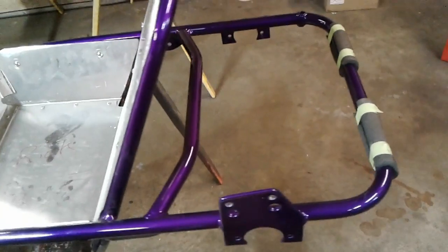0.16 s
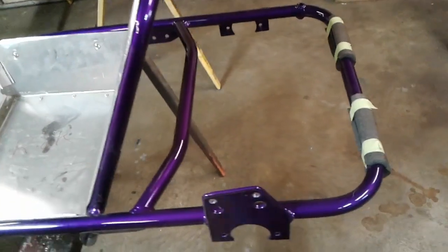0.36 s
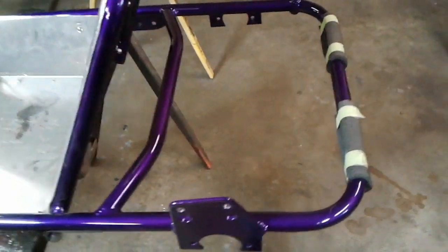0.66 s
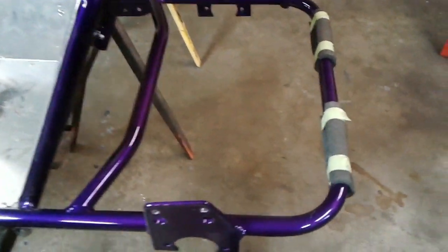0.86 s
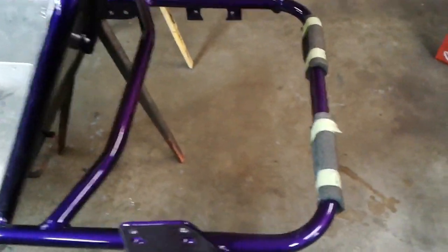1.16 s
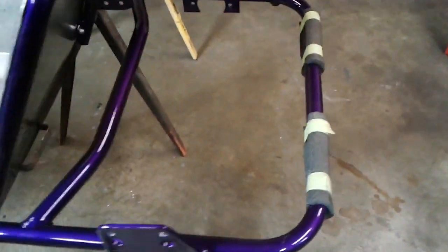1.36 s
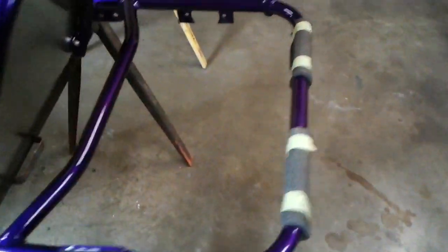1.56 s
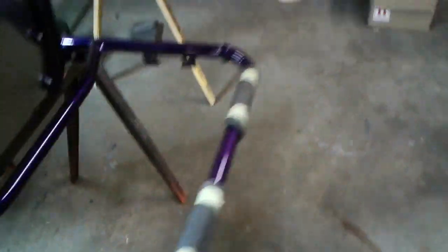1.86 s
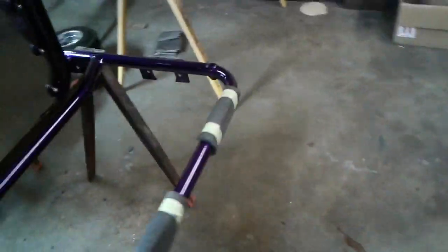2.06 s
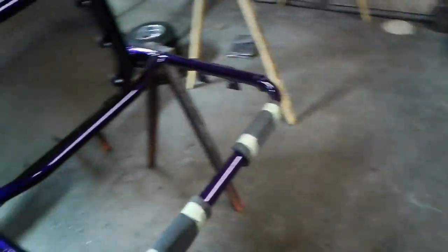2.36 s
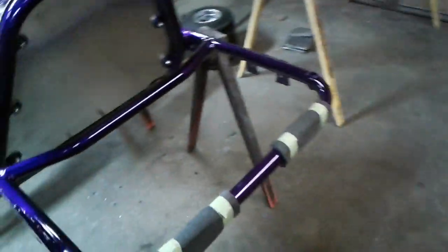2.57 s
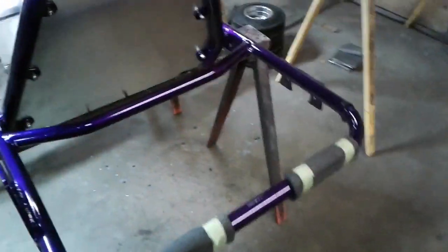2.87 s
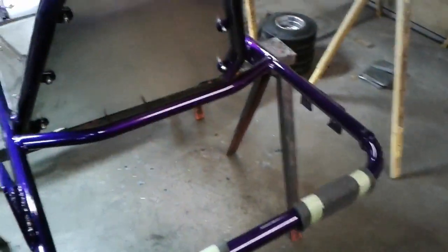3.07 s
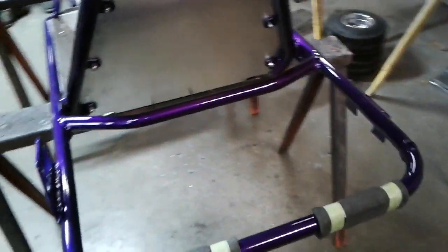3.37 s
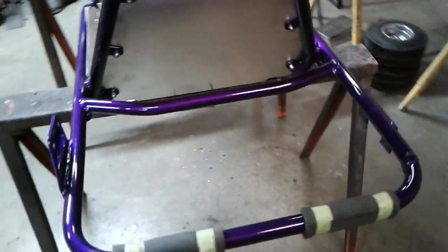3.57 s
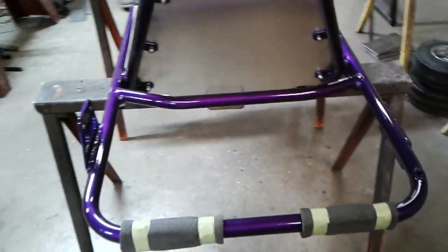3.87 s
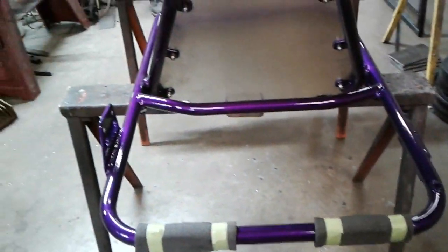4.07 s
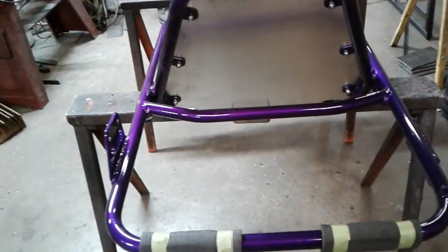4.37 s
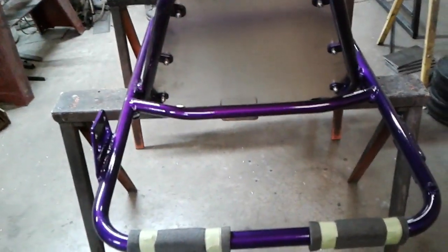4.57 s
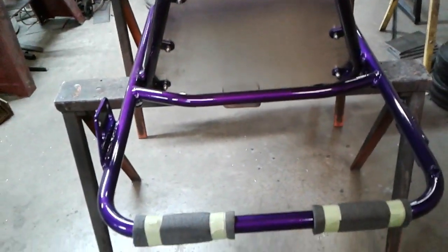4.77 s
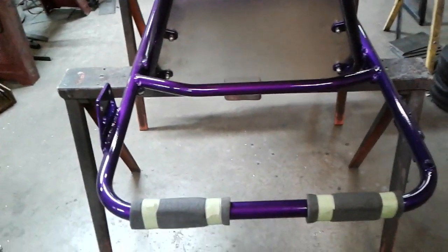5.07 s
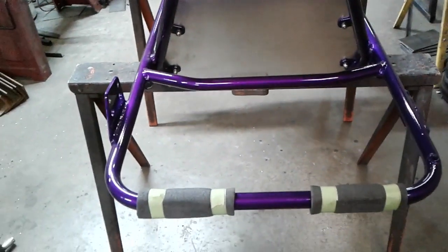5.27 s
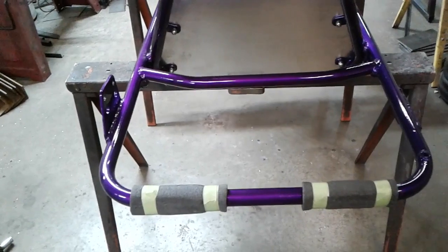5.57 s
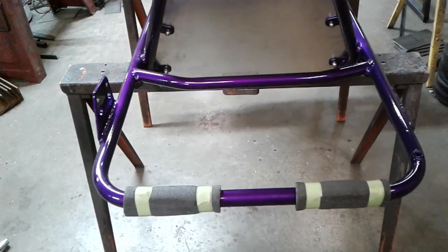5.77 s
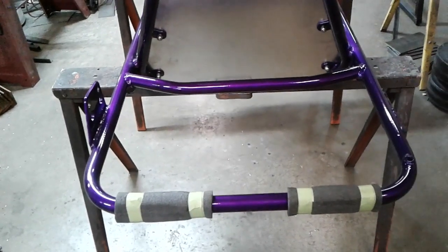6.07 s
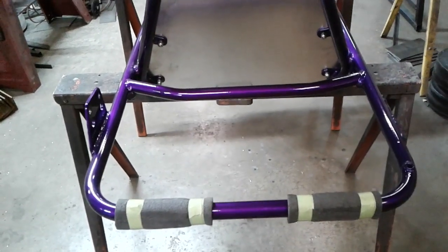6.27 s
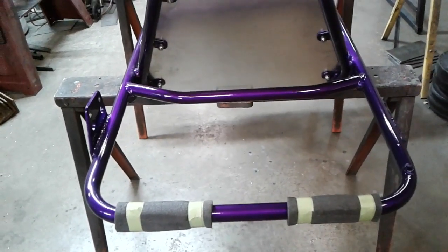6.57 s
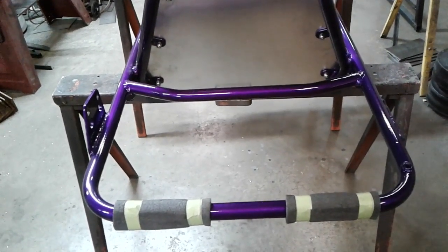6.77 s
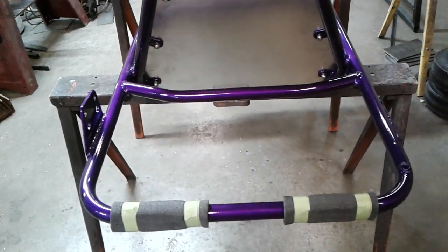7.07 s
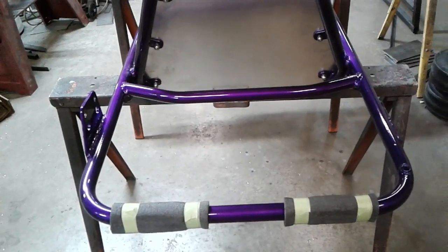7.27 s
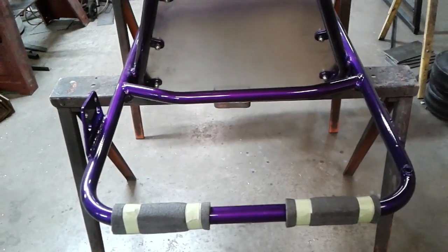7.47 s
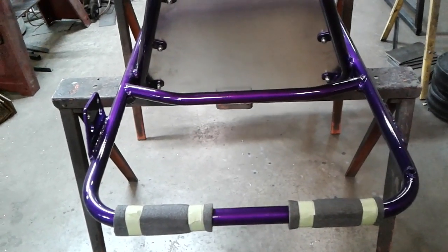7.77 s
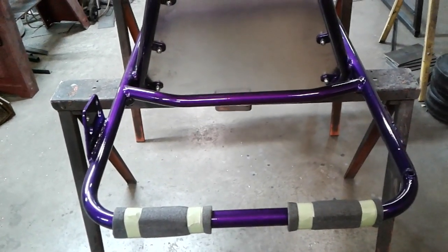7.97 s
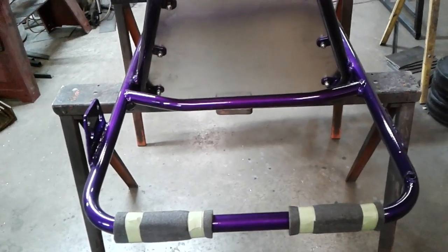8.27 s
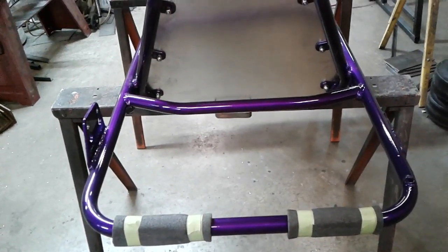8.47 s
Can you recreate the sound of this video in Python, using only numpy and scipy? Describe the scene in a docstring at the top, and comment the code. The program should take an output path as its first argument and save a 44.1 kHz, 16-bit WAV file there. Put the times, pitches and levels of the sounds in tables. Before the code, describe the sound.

A deep electric motor hum swells in a concrete-floored workshop, then holds steady, with soft cloth rustles, shoe scuffs and small ticks close by.

```python
"""A deep motor hum fills a workshop, with a light knock on every turn of the shaft, thin whines and rushing air.
Someone walks a few steps with the microphone, to where the deep hum is much stronger, then keeps still.
Clothes rustle, shoes scuff the concrete floor, a foot thuds softly and a few small ticks sound close by.
Hum, knock and whines are sums of wavering tones; air, cloth, scuffs and ticks are shaped noise;
the thud is a few low tones that ring and die away."""
import sys
import numpy as np
from scipy import signal
from scipy.fft import rfft, irfft, next_fast_len
from scipy.io import wavfile
from scipy.ndimage import uniform_filter1d

SR = 44100
rng = np.random.default_rng(int(sys.argv[2]) if len(sys.argv) > 2 else 0)


def store_pcm(level_fs):
    """Save levels as 16-bit WAV."""
    pcm = np.round(np.clip(level_fs, -1, 1) * 32767).astype(np.int16)
    wavfile.write(sys.argv[1], SR, np.atleast_2d(pcm).T)


N = 380583
TIME = np.arange(N) / SR  # seconds

MAINS_HZ, SHAFT_HZ = 59.99, 29.96
# The walk across the room. Each row: time in seconds, place (0 is the first standpoint, 1 the last).
WALK = [(0, 0), (.5, .08), (1.0, .225), (2.0, .53), (2.5, .62), (3.4, .87), (4.1, 1), (8.6, 1)]
# Places between which the motor's colour changes from that of the first standpoint to that of the last.
COLOUR_FROM, COLOUR_TO = 0.3, 0.88

# Each steady tone stands in the room as a wave, and the walk passes through it.
# Each wave: level at its strongest in dB, place of a weak spot (node), places between nodes,
# what is left at a node in dB against the strongest, extra dB at the first standpoint (fading to 0 at the last).
DEEP_HUM_WAVE = (-24.5, .017, 2.3, -24, -3.6)
SECOND_HUM_WAVE = (-42.7, .6, 1.5, -19, 0)
THIRD_HUM_WAVE = (-39.4, .06, 1.24, -8, -1.8)
# The same columns, but as a gain on the rotor slot whine.
SLOT_WAVE = (-.5, .29, .47, -12, 4.3)

# Shaft harmonics. Each row: multiple of the shaft speed, level at the first standpoint in dB,
# level at the last in dB (both before the sag midway).
SHAFT_HARMONICS = [(3, -60, -60), (5, -56, -66), (6, -71, -53), (7, -72, -68), (9, -57, -50),
                   (10, -54, -59), (11, -54, -56), (13, -60, -54), (14, -53, -54), (15, -54, -62),
                   (16, -52, -56), (17, -55, -52), (19, -67, -61), (20, -57, -55), (21, -68, -65),
                   (24, -55, -61), (28, -71, -59), (29, -69, -66), (42, -73, -68)]

# Bearing and fan tones. Each row: pitch in Hz, level at the first standpoint in dB,
# level at the last in dB, random phase wander in radians.
WHINES = [(591, -70, -58, 0.23), (710, -67, -64.5, 0.18), (793, -75, -60.5, 0.43), (860, -71, -62, 0.14),
          (967, -70, -68.5, 0.18), (1098, -71, -74.5, .2), (1532, -72, -63.5, .5), (1780, -83, -68.5, 0.54),
          (3365, -81, -76.5, 0.55)]
WHISTLE_HZ = 1340  # the clearest whistle
# Level of that whistle along the walk. Each row: time in seconds, level in dB.
WHISTLE_LEVEL = [(0.0, -66), (0.04, -68), (2.39, -54), (2.73, -69), (2.99, -55), (4.02, -60.5), (4.12, -54),
                 (8.55, -54.5), (8.6, -57)]

# Rotor slot whine: three families of evenly spaced tones. Each: centre in Hz, spacing in Hz.
SLOT_LOW = (2053.6, 60.5)
SLOT_MID = (4237, 119.8)
SLOT_HIGH = (4340, 121.2)
# Tones of each family. Each row: steps from the centre, level at the first standpoint in dB,
# level at the last in dB (both before the gain of the standing wave).
SIDEBANDS_LOW = [(-8, -70, -65), (-7, -69, -64.5), (-3, -75, -66.5), (-2, -71, -62), (-1, -76, -62.5),
                 (0, -60, -62), (1, -75, -63), (2, -55.5, -60.5), (3, -75, -68), (4, -68, -77),
                 (5, -76, -73)]
SIDEBANDS_MID = [(-3, -76, -80), (-2, -74, -74), (-1, -73, -74), (0, -66.5, -80), (1, -72, -82),
                 (2, -74, -82), (3, -82, -74)]
SIDEBANDS_HIGH = [(-8, -73, -71), (-7, -75, -74), (-1, -78, -70.5), (0, -78, -70), (1, -80, -72)]

# Rush of air at the two standpoints, before the air's own gain. Each row: pitch in Hz, density in dB per Hz.
AIR_FIRST = [(20, -89), (55, -84.5), (100, -66.5), (150, -67), (400, -69.5), (750, -76.5), (1100, -80),
             (2200, -82), (2800, -88), (4400, -93.5), (6700, -111), (9000, -100), (11500, -123),
             (15500, -112)]
AIR_LAST = [(20, -92.5), (50, -87.5), (95, -68.5), (300, -68.5), (620, -72.5), (1100, -79.5), (2100, -81),
            (2650, -88), (4500, -92), (5100, -105), (6800, -110), (9200, -96), (11300, -124), (15500, -112)]
# Resonances that the air excites. Each row: pitch in Hz, width in Hz, level at the first standpoint in dB,
# level at the last in dB (both before the air's own gain).
AIR_RESONANCES = [(167, 18, -51, -50), (322, 19, -65, -56.5), (617, 49, -77, -62.5),
                  (2160, 150, -64, -59.5), (5665, 87, -91, -72)]

# Colour of rubbing cloth. Each row: pitch in Hz, relative density in dB.
CLOTH_COLOUR = [(500, -16.5), (1200, 5), (2200, 8), (3500, 7.5), (5000, -2), (6700, -14.5), (8000, -3),
                (8900, 3), (10000, -10.5), (11600, -26.5), (13500, -14.5), (15600, -9)]
# Trouser legs swing past each other. Each row: time of the peak in seconds,
# level in dB before the cloth's own gain, spread to either side in seconds.
SWISHES = [(.22, -60, 0.28), (1.12, -60.5, 0.29), (1.55, -61, 0.33), (2.02, -59, 0.15), (2.314, -53, 0.12),
           (2.8, -56.5, 0.082), (3.166, -56.5, 0.27), (3.847, -59, 0.21), (4.348, -59.5, 0.3),
           (4.9, -50, 0.081), (5.06, -60, 0.055)]
# A sliding foot drags the cloth with it: level of the cloth against the scuff, before the cloth's own gain.
DRAG_DB = -16

# Small ticks of handled things. Each row: time in seconds, click level in dB,
# level of the sizzle after it in dB, time the sizzle takes to fall by 60 dB in seconds.
TICKS = [(0.187, -42, -66, .1), (1.3144, -42, -68, .1), (1.5519, -51, -68, 0.076), (2.0258, -42, -66, .1),
         (2.7601, -53, -72, .1), (3.259, -44, -53, .15), (3.4422, -35, -46, 0.4),
         (6.3789, -59, -55.5, 0.72), (8.08, -60, -62, 0.32)]
# Colour of the ticks. Each row: pitch in Hz, relative density in dB.
TICK_COLOUR = [(2000, -19), (7000, -11), (8400, 4.5), (9200, 8), (10500, -11), (12000, -16), (13500, -6),
               (15500, -1.5)]

# Shoe scuffs. Each row: time of the peak in seconds, level in dB before the shoes' own gain,
# spread of the rise in seconds, spread of the fall in seconds, pitch of the scrape in Hz.
SCUFFS = [(.66, -50, 0.023, 0.014, 4700), (1.0, -53, .04, 0.063, 3600), (1.2, -51, .04, .05, 3500),
          (1.405, -50, .025, .04, 3400), (2.08, -48.5, 0.097, 0.056, 3400), (2.31, -56, 0.072, 0.075, 3300),
          (3.07, -48, 0.1, 0.044, 3200), (3.518, -38.5, .018, 0.037, 1940),
          (3.775, -39.5, 0.033, 0.079, 2350), (4.142, -36, 0.0083, 0.026, 2450),
          (4.86, -41.5, 0.048, 0.032, 1790), (4.89, -45.5, .05, 0.067, 5800),
          (4.93, -45, 0.028, 0.037, 2050), (5.77, -52, 0.067, 0.054, 3400), (6.22, -54, 0.076, 0.14, 2800)]
# Colour of a sole on concrete. Each row: pitch in Hz, relative density in dB.
SOLE_COLOUR = [(700, -29.5), (1250, -8.5), (1650, 2.5), (2200, 2.5), (2850, -7), (3500, -2), (4300, -8),
               (5600, -12.5), (6700, -22), (8800, -11), (11500, -36.5), (15500, -31)]

# A soft footfall: time in seconds, gain in dB.
FOOTFALL_S, FOOTFALL_DB = 4.962, -29
# Tones of its thud. Each row: pitch in Hz, relative level in dB, time to fall by 60 dB in seconds.
THUD = [(189, 2, 0.19), (219, 0, 0.2), (261, -4, 0.32), (320, -4, 0.24)]

# Faint steady tones of the electronics. Each row: pitch in Hz, level in dB.
ELECTRONICS = [(9001, -85), (13001, -85), (14002, -91)]
EDGE_HZ = 15800  # upper limit of the sound


def amp(db):
    """Turns decibels into a gain."""
    return 10 ** (np.asarray(db) / 20)


def unit(x):
    """Scales a sound to an average strength (rms) of 1."""
    return x / np.sqrt(np.mean(x ** 2) + 1e-20)


def follow(rows):
    """Draws straight lines through rows of (seconds, value), giving a value for every sample."""
    return np.interp(TIME, *np.transpose(rows))


def between(first_db, last_db, blend):
    """Slides from the level at the first standpoint to that at the last, in dB."""
    return first_db + (last_db - first_db) * blend


def noise(points):
    """Makes noise whose strength over pitch follows rows of (Hz, dB per Hz)."""
    size = next_fast_len(N)
    hz, db = np.transpose(points)
    log_pitch = np.log(np.fft.rfftfreq(size, 1 / SR) + 1)
    colour = amp(np.interp(log_pitch, np.log(hz), db))
    spectrum = rfft(rng.standard_normal(size)) * colour
    return irfft(spectrum, size)[:N] * np.sqrt(SR / 2)


def ringing(hz, width):
    """Makes noise in one steep-sided resonance, with rms 1."""
    size = next_fast_len(N)
    offset = (np.fft.rfftfreq(size, 1 / SR) - hz) / width
    spectrum = rfft(rng.standard_normal(size)) / (1 + offset ** 2)
    return unit(irfft(spectrum, size)[:N])


def drift(per_s):
    """Wanders slowly at random with rms 1, up to about per_s changes a second."""
    size = 4096
    hz = np.fft.rfftfreq(size, TIME[-1] / size)
    keep_slow = (hz > 0) / (1 + (hz / per_s) ** 4)
    slow = irfft(rfft(rng.standard_normal(size)) * keep_slow)
    return np.interp(TIME, np.linspace(0, TIME[-1], size), unit(slow))


def standing(place, wave):
    """Complex gain of a standing wave: it turns over at each node, where only a weak travelling part is left."""
    peak_db, node, spacing, depth_db, first_db = wave
    angle = np.pi * (place - node) / spacing
    level = amp(peak_db + first_db * (1 - place))
    return level * (np.sin(angle) + 1j * amp(depth_db) * np.cos(angle))


def stroke(s, rise, fall):
    """A rubbing movement swells along a bell curve to its peak at s and dies away along another."""
    spread = np.where(TIME < s, rise, fall)
    return np.exp(-0.5 * ((TIME - s) / spread) ** 2)


def hum(place):
    """The iron is pulled twice a mains cycle; the deep hum swells as the walk leaves a node, overtones flutter."""
    pull = 2 * np.pi * 2 * MAINS_HZ * TIME
    # drift in level (dB), then in phase (radians)
    deep = amp(0.22 * drift(2.2)) * np.exp(1j * (pull + 0.011 * drift(3.1)))
    second = amp(0.6 * drift(6)) * np.exp(1j * (2 * pull + 0.028 * drift(3)))
    third = amp(0.7 * drift(2.3)) * np.exp(1j * (3 * pull + 0.03 * drift(2.3)))
    in_room = standing(place, DEEP_HUM_WAVE) * deep
    in_room += standing(place, SECOND_HUM_WAVE) * second
    in_room += standing(place, THIRD_HUM_WAVE) * third
    return np.sqrt(2) * in_room.real


def knock(place, blend, scatter=0.47, far_scatter=0.62, waver_db=1.5, midway_db=-1.5):
    """Shaft harmonics strike together once a turn; along the walk the room smears them more, and midway they sag."""
    turns = SHAFT_HZ * TIME + 0.0037 * drift(1.7)
    smear = scatter + far_scatter * np.sqrt(place)  # radians
    out = np.zeros(N)
    for multiple, first_db, last_db in SHAFT_HARMONICS:
        level = amp(between(first_db, last_db, blend) + waver_db * drift(2))
        phase = 2 * np.pi * multiple * turns + smear * rng.standard_normal()
        out += level * np.cos(phase)
    sag = amp(midway_db * np.sin(np.pi * place))
    return np.sqrt(2) * sag * out


def slot_whine(blend, family, sidebands, blur, waver_db=2, own=0.7):
    """Rotor slots pass the stator; the field splits their tone into sidebands that waver, partly together."""
    centre_hz, spacing_hz = family
    shared_wobble = drift(9)
    out = np.zeros(N)
    for step, first_db, last_db in sidebands:
        level = amp(between(first_db, last_db, blend) + waver_db * drift(3.9))
        turns = (centre_hz + step * spacing_hz) * TIME + rng.random()
        wobble = blur * (shared_wobble + own * drift(5))  # radians
        out += level * np.cos(2 * np.pi * turns + wobble)
    return np.sqrt(2) * out


def whine(blend, waver_db=-0.4, flutter_db=1.25):
    """Bearings and fan give single tones, each wavering on its own."""
    whistle_level = amp(follow(WHISTLE_LEVEL) + flutter_db * drift(8.7))
    out = whistle_level * np.cos(2 * np.pi * WHISTLE_HZ * TIME + 0.2 * drift(3.7))
    for hz, first_db, last_db, blur in WHINES:
        level = amp(between(first_db, last_db, blend) + waver_db * drift(6.1))
        turns = hz * TIME + rng.random()
        out += level * np.cos(2 * np.pi * turns + blur * drift(7.3))
    return np.sqrt(2) * out


def air(blend, throb=0.037, buzz=0.13, patchy_db=0.8, level_db=-2.5):
    """Rushing air and motor hiss excite resonances and pulse with the shaft and with the magnetic pull."""
    rush = np.sqrt(1 - blend) * noise(AIR_FIRST) + np.sqrt(blend) * noise(AIR_LAST)
    for hz, width, first_db, last_db in AIR_RESONANCES:
        rush += amp(between(first_db, last_db, blend)) * ringing(hz, width)
    shaft_pulse = throb * np.cos(2 * np.pi * SHAFT_HZ * TIME)
    pull_pulse = buzz * np.cos(2 * np.pi * 2 * MAINS_HZ * TIME)
    return rush * (1 + shaft_pulse + pull_pulse) * amp(level_db + patchy_db * drift(8))


def clothes(level_db=7, grain_db=0.54, uneven_db=1.45):
    """Cloth slides on cloth with every swing of a leg and every scuff of a shoe."""
    power = np.zeros(N)
    for s, db, spread in SWISHES:
        power += (amp(db) * stroke(s, spread, spread)) ** 2
    for s, db, rise, fall, _ in SCUFFS:
        power += (amp(db + DRAG_DB) * stroke(s, rise, fall)) ** 2
    texture = amp(level_db + uneven_db * drift(6.3) + grain_db * drift(70))
    return unit(noise(CLOTH_COLOUR)) * np.sqrt(power) * texture


def ticks(click_t60=0.005):
    """Each tick is a sharp bright click with a sizzle behind it, both dying away evenly in dB."""
    level = np.zeros(N)
    for s, click_db, sizzle_db, t60 in TICKS:
        age = np.clip(TIME - s, 0, 1)
        click = amp(click_db - 60 * age / click_t60)
        sizzle = amp(sizzle_db - 60 * age / t60)
        level += (TIME >= s) * (click + sizzle)
    return unit(noise(TICK_COLOUR)) * level


def gritty(x, depth_db=2.4):
    """Grit catches and lets go: the colour of a scrape changes in small, quick patches."""
    spectrum = signal.stft(x, nperseg=256)[2]
    patches = rng.standard_normal(spectrum.shape)
    patches = uniform_filter1d(patches, size=3, axis=0)  # smooth over pitch
    patches = unit(uniform_filter1d(patches, size=4, axis=1))  # and over time
    return unit(signal.istft(spectrum * amp(depth_db * patches))[1][:N])


def shoes(grit_db=0.3, ring_db=-5, level_db=-3.0, ring_width=0.16):
    """Soles slide over gritty concrete, each stroke mixing hiss with a scrape of its own pitch."""
    hiss = gritty(noise(SOLE_COLOUR))
    out = np.zeros(N)
    for s, db, rise, fall, hz in SCUFFS:
        scrape = amp(ring_db) * ringing(hz, ring_width * hz)
        out += amp(db) * stroke(s, rise, fall) * (hiss + scrape)
    return out * amp(level_db + grit_db * drift(150))


def footfall(onset_s=0.0046):
    """A foot lands with a soft thud: a few low tones start together and die away."""
    age = np.maximum(TIME - FOOTFALL_S, 0)
    ring = np.zeros(N)
    for hz, db, t60 in THUD:
        ring += amp(db - 60 * age / t60) * np.cos(2 * np.pi * hz * age)
    soft_start = 1 - np.exp(-age / onset_s)
    return amp(FOOTFALL_DB) * soft_start * ring


def scene():
    """Adds the motor as heard along the walk and the walker's own small noises."""
    place = follow(WALK)
    blend = np.clip((place - COLOUR_FROM) / (COLOUR_TO - COLOUR_FROM), 0, 1)
    slots = slot_whine(blend, SLOT_LOW, SIDEBANDS_LOW, blur=0.27)
    slots += slot_whine(blend, SLOT_MID, SIDEBANDS_MID, blur=0.7)
    slots += slot_whine(blend, SLOT_HIGH, SIDEBANDS_HIGH, blur=0.99)
    slots_in_room = abs(standing(place, SLOT_WAVE)) * slots
    motor = hum(place) + knock(place, blend) + slots_in_room + whine(blend) + air(blend)
    walker = clothes() + ticks() + shoes() + footfall()
    return (motor + walker)[None]


def record(dry):
    """Adds the faint tones of the electronics, then cuts everything above the upper limit."""
    tones = np.zeros(N)
    for hz, db in ELECTRONICS:
        tones += np.sqrt(2) * amp(db) * np.sin(2 * np.pi * hz * TIME)
    lowpass = signal.firwin(511, EDGE_HZ, window=("kaiser", 9), fs=SR)
    return signal.oaconvolve(dry + tones, lowpass[None], "same")


dry = scene()
out = record(dry)
store_pcm(out)
```